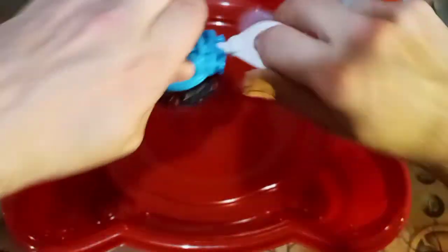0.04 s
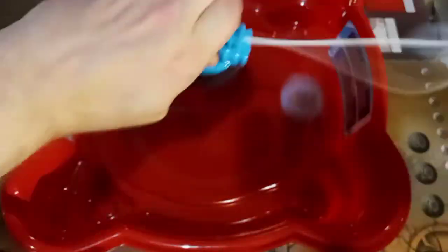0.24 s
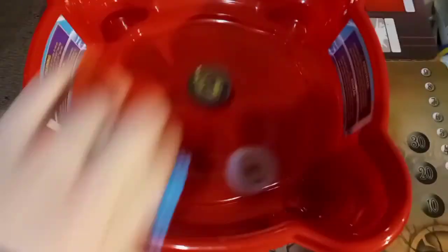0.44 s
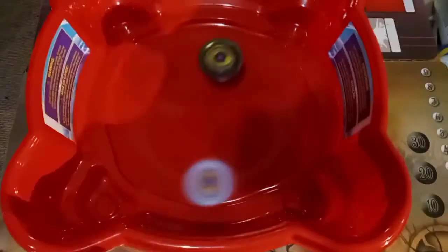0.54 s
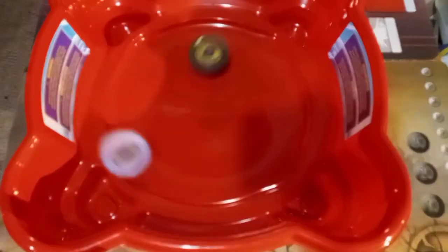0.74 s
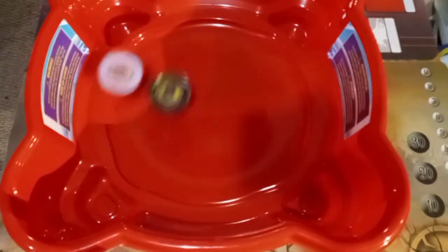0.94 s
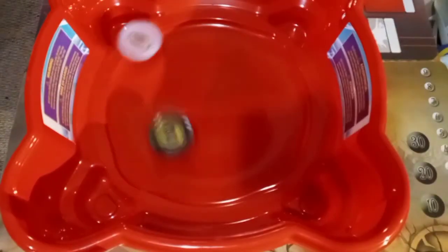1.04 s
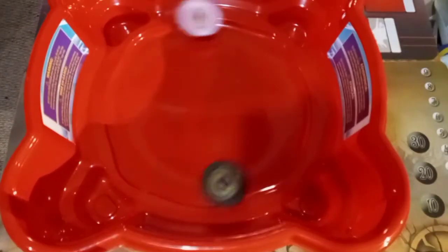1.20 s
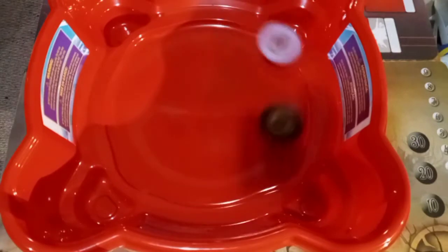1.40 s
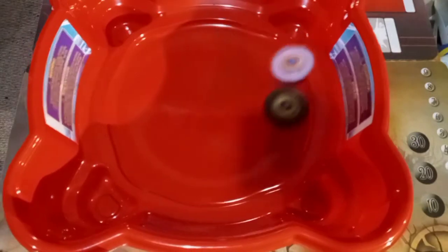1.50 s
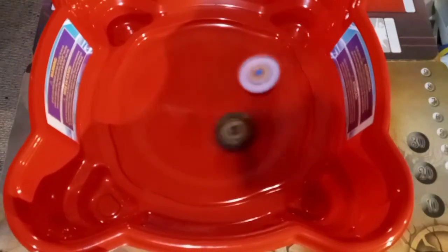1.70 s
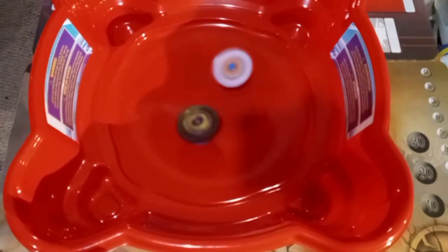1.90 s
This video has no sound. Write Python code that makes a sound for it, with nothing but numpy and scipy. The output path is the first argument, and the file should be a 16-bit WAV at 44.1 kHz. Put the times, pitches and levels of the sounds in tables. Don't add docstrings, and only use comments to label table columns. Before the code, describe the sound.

Spinning tops battle in a hollow plastic bowl, heard close in a small room. Faint launcher ticks lead to knocks at 0.2 s and a harsh ripcord zip peaking near 0.32 s. A top lands with a deep boom at 0.47 s, then dense clattering bounces until 1.0 s. Lighter skips and gritty scraping follow, a hard knock at 1.28 s, sharp metal clashes at 1.55 and 1.67 s, then more skittering.

```python
import sys
import numpy as np
from scipy import signal
from scipy.io import wavfile
from scipy.ndimage import uniform_filter1d

SR = 44100
rng = np.random.default_rng(int(sys.argv[2]) if len(sys.argv) > 2 else 0)


def store_pcm(level_fs):
    pcm = np.round(np.clip(level_fs, -1, 1) * 32767).astype(np.int16)
    wavfile.write(sys.argv[1], SR, np.atleast_2d(pcm).T)


def decibels_to_gain(level_db):
    exponent = np.asarray(level_db, float) / 20
    return 10 ** exponent


N = 85995

# start [s], knock [dB], bowl boom [dB], rim tick [dB], knock pitch [Hz].
BLOWS = [(0.198, -11.5, -41, -30.5, 1240), (0.207, -11.5, -42, -18, 698), (0.4685, -6.5, 0, -19, 900),
         (0.5655, -8.5, -7.5, -29, 1400), (0.606, -16, -15, -67, 1340), (0.641, -15, -19, -28.5, 1290),
         (0.673, -4.5, -9.5, -20.5, 935), (0.69, -7, -11.5, -33, 616), (0.82, -9, -15, -25, 1400),
         (0.853, -10, -20, -25, 600), (0.9255, -7, -21, -22.5, 1070), (0.938, -21, -28, -33.5, 1100),
         (1.003, -9.5, -16.5, -24.5, 1130), (1.281, -4, -22, -17, 985), (1.549, -17.5, -55, -17, 886),
         (1.619, -12.5, -49, -22.5, 1240), (1.671, -31, -53, -20, 2900)]
# start [s], knock [dB], bowl boom [dB], rim tick [dB], knock pitch [Hz].
REBOUNDS = [(.827, -9.5, -28.5, -34, 537), (.861, -13.5, -22, -57, 710), (.877, -34, -28, -31.5, 605),
            (1.012, -15, -26, -35, 1110), (1.284, -5, -46, -28, 590), (1.296, -12, -25, -28, 590),
            (1.556, -10.5, -49, -36, 770), (1.632, -15.5, -28.5, -48, 1030), (1.887, -24, -23, -56, 690),
            (1.184, -13, -30, -47, 960), (1.204, -26, -43, -47, 1230)]
# start [s], knock [dB], bowl boom [dB], rim tick [dB],
# knock pitch [Hz].
SKIPS = [(0.717, -20, -16, -45, 895), (0.882, -25, -47, -54, 570), (1.045, -16, -29, -32, 770),
         (1.088, -16, -19, -33, 490), (1.126, -21.5, -63, -32, 1170), (1.171, -20.5, -29, -32.5, 554),
         (1.194, -15, -56, -32, 654), (1.218, -17.5, -20, -38, 1330), (1.246, -18.5, -26, -52, 533),
         (1.325, -10.5, -25, -31, 810), (1.377, -13.5, -39, -34, 900), (1.428, -19, -72, -30, 900),
         (1.472, -18, -33, -39.5, 990), (1.516, -17.5, -45, -33, 980), (1.728, -17.5, -43, -28, 1240),
         (1.756, -20, -47, -35.5, 1050), (1.78, -19.5, -25, -38, 910), (1.827, -19.5, -30.5, -41, 1050),
         (1.868, -15.5, -51, -31, 1140), (1.876, -22, -26, -44, 715), (1.923, -14.5, -21.5, -30, 1220)]
# start [s], level [dB].
CLASHES = [
    (1.4309, -33.5),
    (1.5183, -30),
    (1.547, -11),
    (1.552, -11.5),
    (1.6722, -8.5),
    (1.6728, -21),
    (1.925, -32),
]
# time [s], rasp [dB], housing rumble [dB].
RELEASE = [
    (0.316, -19, -42),
    (0.324, -10, -31.5),
    (0.335, -18.5, -63),
    (0.351, -22, -76),
    (.4, -30, -47.5),
    (0.441, -36, -44.5),
    (.452, -48, -64),
    (.466, -66, -76),
]


def evened(x):
    return x / np.sqrt(np.mean(x ** 2) + 1e-20)


def high_pass(x, order, cut_hz):
    return signal.sosfilt(signal.butter(order, cut_hz, "high", fs=SR, output="sos"), x)


def read(points, hz):
    f, value = np.transpose(points)
    return np.interp(np.log(hz + 1), np.log(f + 1), value)


def coloured(x, spectrum):
    hz = abs(np.fft.fftfreq(4096, 1 / SR))
    log_gain = np.log(decibels_to_gain(np.maximum(read(spectrum, hz), -100)))
    taps = np.fft.ifft(np.exp(np.conj(signal.hilbert(log_gain)))).real[:2048]
    return evened(signal.oaconvolve(x, taps)[:len(x)])


def clicks(per_s, spread_db):
    size = decibels_to_gain(spread_db * np.minimum(rng.exponential(1, N), 4))
    sign = rng.choice([-1., 1.], N)
    return size * sign * (rng.random(N) < per_s / SR)


def curve(points, axis):
    p = np.array(points)
    return decibels_to_gain(np.interp(np.arange(N) / SR, p[:, 0], p[:, axis], left=-120, right=-120))


def add(mix, start_s, sound):
    part = mix[round(start_s * SR):][:len(sound)]
    part += sound[:len(part)]


def ring(modes, size=4000, flip=1):
    hz, db, t60_s = np.transpose(modes)[:, :, None]
    t = np.arange(size) / SR
    place_db = 2 * rng.standard_normal((len(hz), 1))
    level_db = db + place_db - 60 * t / np.maximum(t60_s, 0.005)
    sign = np.resize([1, flip], len(hz))[:, None]
    return (sign * decibels_to_gain(level_db) * np.sin(2 * np.pi * hz * t)).sum(0)


def struck(body, chatter_s, share=0.24):
    t = np.arange(900) / SR
    chatter = share * rng.standard_normal(len(t)) * np.exp(-t / chatter_s)
    out = signal.fftconvolve(body, chatter + (t == 0))
    return out / np.sqrt(np.mean(out[:440] ** 2))


def hush():
    # frequency [Hz], density [dB per Hz].
    hush_colour = [(15, -71), (100, 2.5), (399, 14.5), (457, 7.5), (617, 12.5), (878, 13), (2090, -12),
                   (6920, -9.5), (16500, -53)]
    rasp_level = uniform_filter1d(curve(RELEASE, axis=1), size=2000)
    duck = 1 / (1 + 4 * rasp_level / decibels_to_gain(-46))
    return decibels_to_gain(-50) * duck * coloured(rng.standard_normal(N), hush_colour)


def room(x):
    # frequency [Hz], t60 [s].
    decay = [(150, 0.27), (600, 0.17), (2000, 0.041), (6000, 0.093), (15000, 0.18)]
    taps = np.zeros(SR // 2)
    at = np.arange(200, len(taps) - 20, 20)
    taps[at + rng.integers(0, 20, len(at))] = rng.choice([-1., 1.], len(at))
    hz, t, z = signal.stft(taps, SR, nperseg=256)
    t60_s = np.maximum(read(decay, hz), 0.05)[:, None]
    tail = signal.istft(z * decibels_to_gain(-60 * t / t60_s), SR, nperseg=256)[1]
    return signal.fftconvolve(x, tail / np.linalg.norm(tail))[:N]


def launcher_modes():
    # frequency [Hz], width [Hz], level [dB].
    resonances = [(2790, 470, -13.5), (4260, 200, -19), (4800, 440, -12), (5430, 370, -9), (5860, 360, -14),
                  (7120, 200, -14), (7360, 160, -14), (8150, 450, -23), (9040, 900, -24.5)]
    return [(hz, db, 2.15 / width_hz) for hz, width_hz, db in resonances]


def launcher():
    # time [s], rasp [dB], housing rumble [dB].
    pull = [
        (.172, -64, -50.5),
        (.2, -55, -37.5),
        (.213, -34, -33),
        (.247, -30.5, -41),
        (.256, -31, -30),
        (.266, -25.5, -42.5),
        (.296, -17.5, -38),
        (.308, -29.5, -87),
        (.314, -29, -44),
    ]
    # start [s], level [dB].
    fidget = [(0.012, -44), (0.0404, -46), (0.0573, -40), (0.099, -47), (0.1155, -42.5), (0.13, -48),
              (0.147, -43), (0.163, -45), (0.181, -40)]
    # frequency [Hz], density [dB per Hz].
    rasp_colour = [(880, -81), (1500, -98), (2500, -14), (3410, -5.5), (6560, 1.5), (7800, -0.5),
                   (9790, -12.5), (15500, -11.5), (16500, -56)]

    teeth = clicks(per_s=5000, spread_db=2.5)
    resonant = evened(signal.fftconvolve(teeth, ring(launcher_modes(), flip=-0.77))[:N])
    broad = decibels_to_gain(-1.5) * coloured(teeth[::-1], rasp_colour)
    rasp = evened(high_pass(resonant + broad, 6, 1700))
    housing = evened(signal.fftconvolve(clicks(970, 1.2), knock(1330))[:N])

    out = np.zeros(N)
    for points in (pull, RELEASE):
        out += curve(points, axis=1) * rasp + curve(points, axis=2) * housing
    for start_s, db in fidget:
        tick = struck(ring(launcher_modes(), flip=-1.27), 0.0047)
        add(out, start_s - 0.001, decibels_to_gain(db - 12.5) * tick)
    return out


def rims():
    # start [s], level [dB].
    ticks = [(0.239, -25), (0.255, -15.5), (0.967, -42), (1.156, -61), (1.264, -50), (1.406, -53),
             (1.415, -37), (1.45, -42), (1.539, -40), (1.609, -41), (1.624, -23.5), (1.659, -47),
             (1.795, -32.5), (1.804, -37), (1.838, -32), (1.845, -58)]
    # frequency [Hz], density [dB per Hz].
    crack_colour = [(1180, -71), (2000, 0), (2770, 3.5), (3950, -1.5), (5670, 3), (9380, -10.5),
                    (14700, -36.5), (16100, -12), (16500, -46)]
    # frequency [Hz], density [dB per Hz].
    tail_colour = [(880, -34.5), (1500, -8.5), (2820, -10), (3810, -9.5), (5470, -4), (10300, -21),
                   (14900, -17.5), (16000, -20), (16500, -20)]
    crack_s, tail_db, tail_t60_s = 0.004, -9.5, 0.19

    t = np.arange(16000) / SR
    hits = [(row[0], row[3] - 1.5) for row in list(BLOWS) + list(SKIPS) + list(REBOUNDS)]
    hits += [(start_s, db - 3.9) for start_s, db in ticks]
    crack_power, tail_power = np.zeros(N), np.zeros(N)
    for start_s, db in hits:
        add(crack_power, start_s, decibels_to_gain(2 * db + 9) * np.exp(-2 * t / crack_s))
    for start_s, db in hits + [(start_s, db - 6) for start_s, db in CLASHES]:
        fall = decibels_to_gain(2 * (db + tail_db - 60 * t / tail_t60_s))
        add(tail_power, start_s, fall * np.minimum(t / 0.0007, 1))

    burst = np.sqrt(crack_power) * evened(clicks(11000, 0.94))
    burst_rms = np.sqrt(np.mean(burst ** 2))
    wash = np.sqrt(tail_power) * coloured(rng.standard_normal(N), tail_colour)
    return burst_rms * coloured(burst, crack_colour) + wash


def clashes():
    # frequency [Hz], level [dB], t60 [s].
    metal = [(2770, -11, 0.022), (4750, 2, 0.013), (4350, -12, 0.01), (4900, -13, 0.016),
             (5650, 9.5, 0.017), (6140, -7.5, 0.042), (6290, -1.5, 0.014), (7180, -2.5, 0.027),
             (7870, 5.5, 0.0068), (11800, 0, 0.0052), (13300, -0.5, 0.0089), (15000, 1, .006)]
    out = np.zeros(N)
    for start_s, db in CLASHES:
        add(out, start_s, decibels_to_gain(db - 9) * struck(ring(metal, size=2500, flip=-0.98), 0.0018, 0.74))
    return out


def boom():
    # frequency [Hz], level [dB], t60 [s].
    low_modes = [(145, -16, 0.13), (176.8, 10.5, 0.24), (212, 1, 0.2), (239, 4.5, 0.15), (288, 8.5, 0.31),
                 (340.6, 5.5, 0.21), (355, 9, 0.085), (447.5, 13, 0.3)]
    hz, db, t60_s = np.tile(low_modes, (4, 1)).T
    hz = hz * (1 + 0.06 * rng.standard_normal(len(hz)))
    t60_s = t60_s * rng.uniform(0.3, 1, len(hz))
    return ring(np.c_[hz, db, t60_s], size=8000)


def knock(knock_hz):
    # frequency [Hz], level [dB], t60 [s].
    wall = [(512.8, -14, 0.6), (590, 0.5, 0.12), (704.7, 0.5, 0.14), (838.8, -1, 0.17), (900, -7, 0.2),
            (988, 9, 0.047), (1099, 5, 0.045), (1240, 9.5, 0.03), (1400, 2, 0.034), (1562, 6.5, 0.025),
            (1798, 4.5, 0.045), (2140, -8, 0.089), (2751, 4, 0.11), (3090, -4, 0.15)]
    hz, db, t60_s = np.tile(wall, (2, 1)).T
    twin = np.repeat([0, 1], len(wall))
    hz = hz * (1 + 0.025 * (0.34 + twin) * rng.standard_normal(len(hz)))
    db = db - 9 * abs(np.log2(hz / knock_hz))
    walls = np.c_[hz, db, t60_s * (1 - 0.55 * twin)]
    contact_spot = [[knock_hz, 11.5, 0.036]]
    return ring(np.r_[walls, contact_spot], size=6000)


def scrape():
    # time [s], level [dB].
    pressure = [(0, -61), (.3, -85), (.33, -87), (.45, -53.5), (.5, -40), (.7, -43), (.8, -45), (.86, -30),
                (.9, -45), (1.15, -41.5), (1.2, -36.5), (1.26, -42.5), (1.4, -41.5), (1.52, -45.5),
                (1.6, -37.5), (1.7, -42.5), (1.85, -37), (1.95, -38.5)]
    # frequency [Hz], density [dB per Hz].
    scrape_colour = [(35, -37), (60, -59), (573, 9), (2350, 6.5), (4430, -4), (5870, -3), (10100, -35),
                     (15400, -40), (16500, -28)]
    grain_s = 0.0012
    grain = np.exp(-np.arange(600) / SR / grain_s)
    bumps = abs(clicks(per_s=1200, spread_db=4))
    grit = np.convolve(bumps, grain)[:N] * rng.standard_normal(N)
    rung = evened(signal.fftconvolve(grit, boom())[:N])
    return curve(pressure, axis=1) * (coloured(grit, scrape_colour) + decibels_to_gain(-10) * rung)


def bounces():
    out = np.zeros(N)
    for rows, share in ((BLOWS, 0.16), (SKIPS, 0.4), (REBOUNDS, 0.4)):
        for start_s, knock_db, boom_db, _, knock_hz in rows:
            add(out, start_s, decibels_to_gain(boom_db - 11) * struck(boom(), 0.0064))
            add(out, start_s, decibels_to_gain(knock_db - 13.5) * struck(knock(knock_hz), 0.0039, share))
    return out


def scene():
    dry = high_pass(bounces() + scrape() + launcher(), 3, 120)
    mid = dry + decibels_to_gain(-5.5) * room(dry) + rims() + clashes() + hush()
    smear = rng.standard_normal(60) / np.sqrt(60)
    side = decibels_to_gain(-23) * high_pass(np.convolve(mid, smear)[:N], 10, 5300)
    return np.array([mid + side, mid - side])


def low_pass(x):
    return signal.sosfilt(signal.butter(12, 16980, fs=SR, output="sos"), x)


def record(dry):
    x = high_pass(dry, 3, 80)
    band_limit = signal.firwin(255, 15900, window=("kaiser", 5), fs=SR)
    x = signal.oaconvolve(x, band_limit[None], "same")
    return low_pass(x)


dry = scene()
out = record(dry)
store_pcm(out)
```